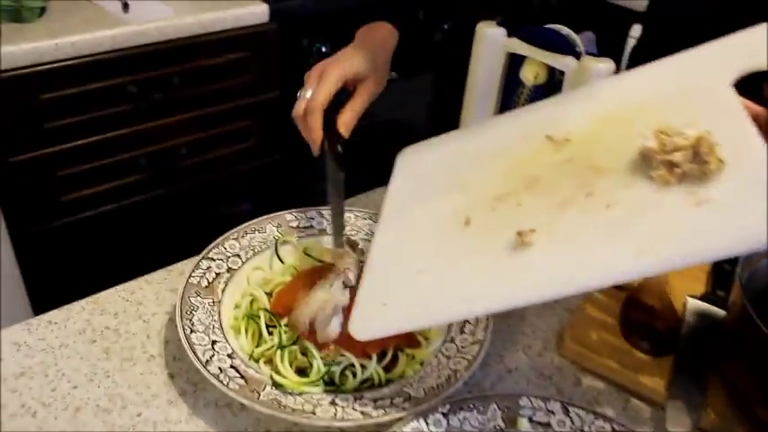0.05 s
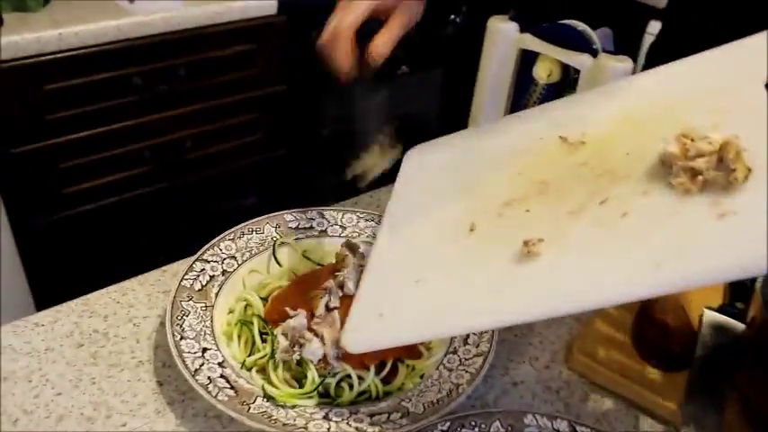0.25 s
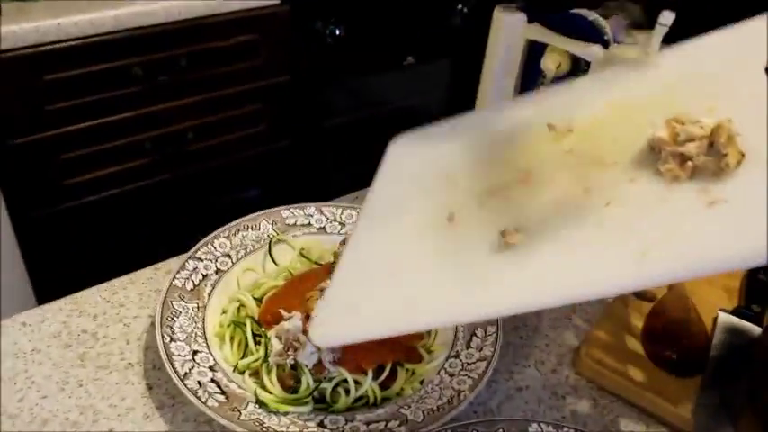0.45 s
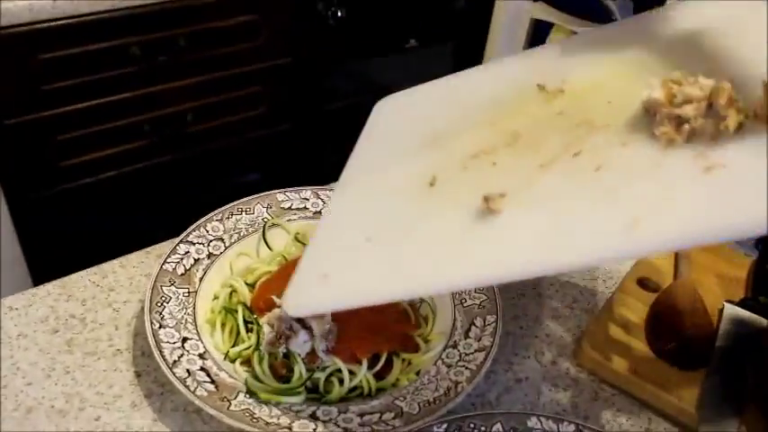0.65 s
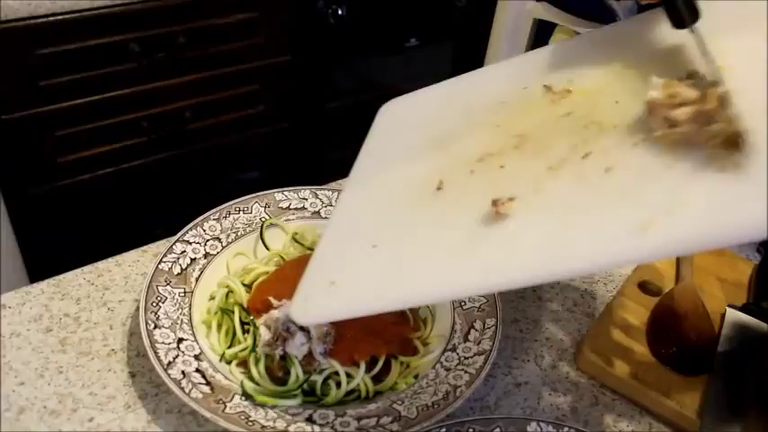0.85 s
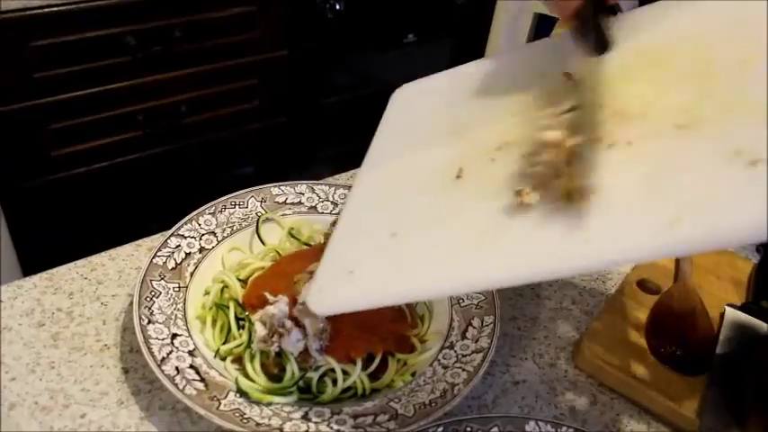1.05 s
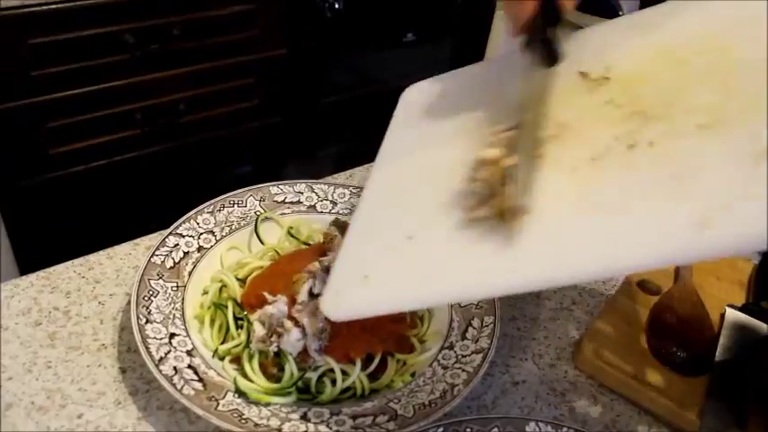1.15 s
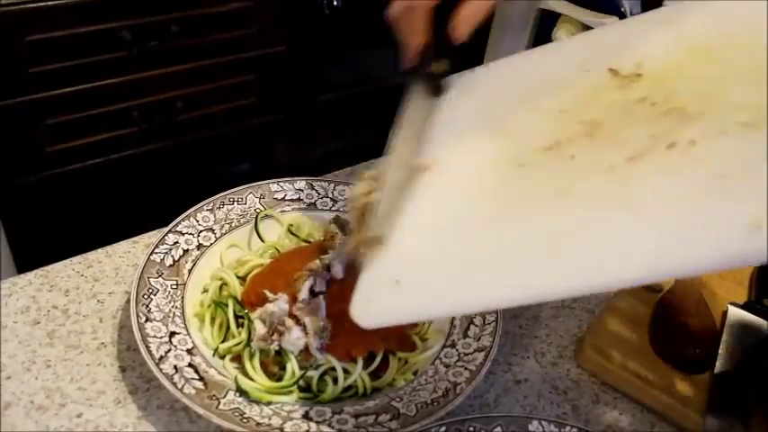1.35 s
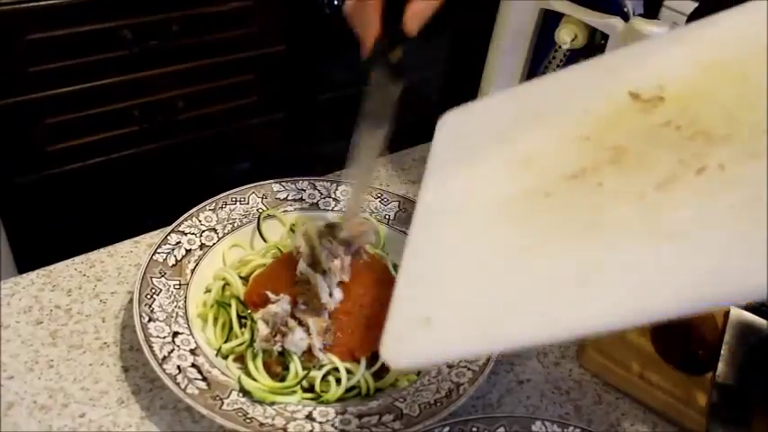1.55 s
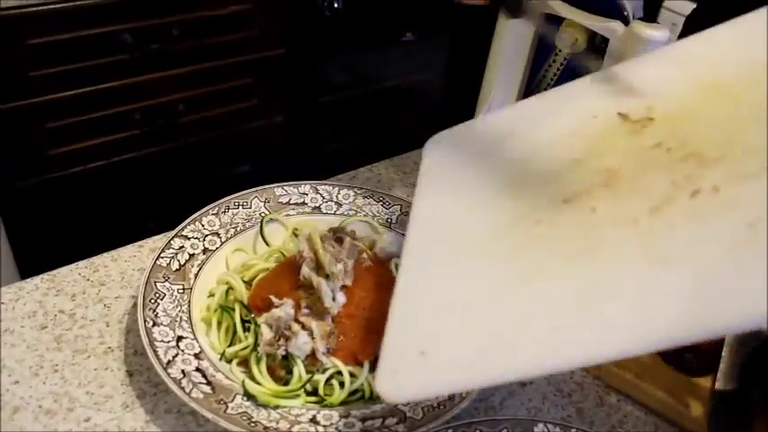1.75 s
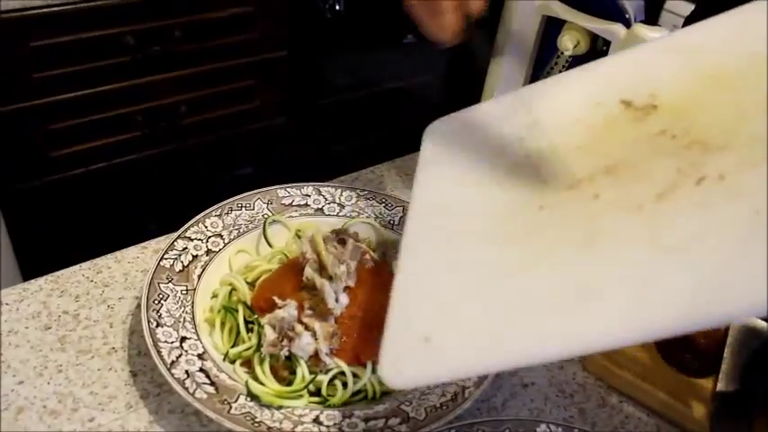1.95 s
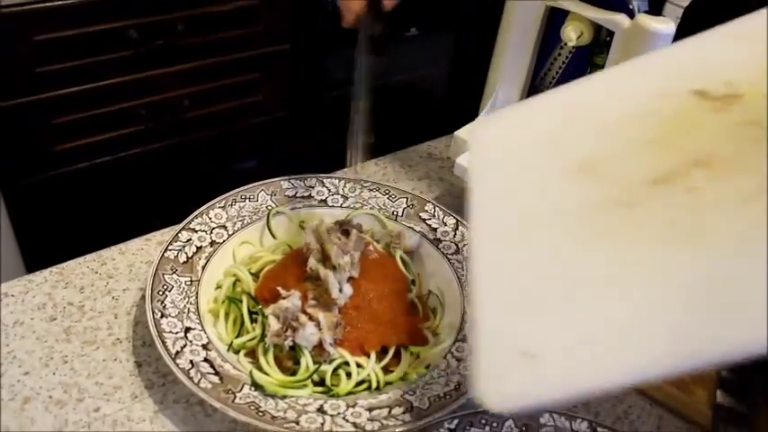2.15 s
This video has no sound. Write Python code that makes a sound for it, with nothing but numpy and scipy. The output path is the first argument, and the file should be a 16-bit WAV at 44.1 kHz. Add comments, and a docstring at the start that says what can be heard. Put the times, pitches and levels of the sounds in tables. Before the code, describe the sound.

A kitchen knife scrapes across a plastic chopping board, with a sharp crack before and a knock after.

```python
"""A kitchen knife scrapes along a plastic chopping board, judders and slides off the rim: one close microphone.
Random catches of the edge drive the board's and blade's resonances; short blows ring the board before and after.
The second blow starts a brief skid with a squeak. Before it all, food lands on a plate: shaped noise and clicks.
A small hard kitchen, made of decaying noise, answers at a lower level over room air and a faint hum."""
import sys
import numpy as np
from scipy import signal
from scipy.fft import rfft, irfft
from scipy.io import wavfile
from scipy.ndimage import uniform_filter1d

SR = 44100
rng = np.random.default_rng(int(sys.argv[2]) if len(sys.argv) > 2 else 0)


def to_wav(s):
    """Save 16-bit WAV."""
    ch = np.atleast_2d(s).T  # columns
    pcm = np.round(np.clip(ch, -1, 1) * 32767)  # PCM
    wavfile.write(sys.argv[1], SR, pcm.astype(np.int16))


N = 97020

# The long stroke. Each row: time in seconds, relative level in dB of the board's rumble, of the edge's rasp.
STROKE_LEVELS = [(.81, -38, -40), (.86, -41, -36.5), (.915, -38.5, -40), (.95, -33.5, -33),
                 (1.04, -27, -23.5), (1.08, -26.5, -27), (1.145, -27.5, -27), (1.195, -35.5, -31),
                 (1.25, -28, -28.5), (1.31, -29, -29), (1.34, -31, -27), (1.375, -24, -25),
                 (1.41, -42.5, -25.5), (1.44, -44, -31), (1.455, -47, -27), (1.469, -43, -30)]
# The board's main resonance as the blade moves. Each row: time in seconds, centre in Hz, relative level in dB.
BOARD_RESONANCE = [(.85, 502, 1.5), (.94, 378, 6), (.99, 305.4, -1), (1.06, 353, -3), (1.14, 380, 4.5),
                   (1.21, 381, 2), (1.28, 502, -10), (1.35, 575, -9), (1.39, 525, -2.5), (1.47, 528, -1)]
# Colour of the board's rumble. Each row: frequency in Hz, relative level in dB.
RUMBLE_SPECTRUM = [(100, -37), (200, -28), (270, -2), (400, -4.5), (500, 5.5), (640, 3), (800, -2),
                   (1200, -10.5), (3000, -22)]
# Colour of the edge's rasp. Each row: frequency in Hz, relative level in dB.
RASP_SPECTRUM = [(200, -22.5), (500, -9), (900, 3), (1400, 1), (2000, -1), (2500, 0.5), (4000, -1),
                 (5500, -3.5), (8000, -10.5), (11000, -15.5), (14000, -23), (16000, -31.5)]
# Resonances under the sliding edge. Each row: centre in Hz, half-width in Hz,
# relative level in dB early in the stroke, late in the stroke, in the skid.
BLADE_MODES = [(515.4, 14, -6.5, -15.5, -4.5), (624, 40, -16, -10, -22), (772, 57, -13.5, -6.5, -13),
               (873, 103, -37, -9.5, -27), (1052.7, 38, -3, -9, -11), (1799, 102, -4.5, -9, -15),
               (2153, 138, -12.5, -3.5, -12), (3405, 230, -25, -6, -9), (4504, 165, -3.5, -5, -7.5),
               (5796, 120, -9, -15, -18), (6430, 480, -14.5, -12.5, -18), (7450, 790, -15, -21, -21),
               (9050, 440, -24, -20.5, -16.5), (10360, 270, -34, -18.5, -42), (11580, 620, -23, -20, -30),
               (15200, 420, -48, -20, -37)]
# Colour of the snap off the rim. Each row: frequency in Hz, relative level in dB.
SNAP_SPECTRUM = [(200, -25), (900, 0), (2200, -2), (3600, -5), (4600, 4), (5600, 1), (9000, -13),
                 (13000, -17), (15500, -7)]
# High resonances of the edge just after landing. Each row: centre in Hz, half-width in Hz, relative level in dB.
FIZZ_MODES = [(7600, 500, -5), (8650, 240, -3), (10400, 180, -3), (11950, 250, -1.5), (13500, 400, -2),
              (15200, 500, -7)]
# Blows of the knife. Each row: start in seconds, relative level in dB,
# hardness from 0 (a dull knock) to 1 (a crack of the edge).
KNIFE_BLOWS = [(.7988, -15.5, 1), (.7999, -12.5, 0.66), (.8011, -17.5, 1), (.8041, -20, 0.93),
               (0.8069, -23.5, 0.4), (0.8113, -22, 0.97), (1.984, -9, 0.016), (1.9876, -20, 0.58)]
# Colour of a hard contact. Each row: frequency in Hz, relative level in dB.
CRACK_SPECTRUM = [(60, -54), (150, -22), (260, 10.5), (420, 9), (540, -22), (700, -17.5), (1150, 8),
                  (1450, 8.5), (1750, -0.5), (2080, -8.5), (2500, 1), (3500, -1), (6000, -9), (7500, -37),
                  (16000, -47)]
# Colour of a dull contact. Each row: frequency in Hz, relative level in dB.
KNOCK_SPECTRUM = [(60, -51), (140, -31), (250, -11.5), (430, -7.5), (570, 3), (980, -6), (1400, -17.5),
                  (2600, -16), (4500, -44), (16000, -41)]
# Long rings of board and knife. Each row: frequency in Hz, 60 dB decay in seconds,
# level in dB after the cracks, level in dB after the knocks.
LONG_RINGS = [(495.5, .36, -21, -26), (623, .22, -60, -53), (830, 0.2, -72, -38), (1026, 0.4, -34.5, -35),
              (1120, 0.44, -32, -50.5), (1337, 0.41, -29, -41), (1770, 0.17, -26, -44),
              (4829, 0.65, -45, -50.5)]
# Colour of the skid's rasp. Each row: frequency in Hz, relative level in dB.
SKID_SPECTRUM = [(150, -34), (350, -7), (600, -9), (1500, -0.5), (3200, -1.5), (5200, -4), (8500, -9),
                 (11000, -17), (14000, -22), (16000, -30)]
# Food landing on the plate. Each row: peak in seconds, rise in seconds, decay in seconds,
# level in dB of the thud, level in dB of the wet crackle.
FOOD_DROPS = [(.006, 0.0098, 0.013, -36.5, -43.5), (0.071, 0.012, 0.022, -35.5, -34.5),
              (.2, 0.11, 0.066, -66, -45.5)]
# Colour of the plate's thud. Each row: frequency in Hz, relative level in dB.
THUD_SPECTRUM = [(50, -20), (110, -6), (170, 0), (300, -2), (600, -10), (1500, -22), (5000, -53)]
# Colour of the wet crackle. Each row: frequency in Hz, relative level in dB.
SQUELCH_SPECTRUM = [(200, -29), (700, -0.5), (1050, 2.5), (2000, -6), (4300, -6.5), (7000, -16),
                    (11000, -25.5), (16000, -29)]
# Decay of the kitchen. Each row: band centre in Hz, 60 dB decay in seconds.
ROOM_DECAYS = [(150, 0.4), (500, 0.3), (1500, 0.35), (3500, 0.35), (7000, 0.31), (15000, 0.25)]
# Colour of the room air. Each row: frequency in Hz, relative level in dB.
AIR_SPECTRUM = [(15, -56), (25, -14.5), (144, -3.5), (289, -4), (340, -8.5), (457, -3.5), (552, -7),
                (614, -8), (895, -14.5), (1170, -14), (2060, -17.5), (2920, -18.5), (15500, -31)]
# Appliance hum. Each row: frequency in Hz, mid level in dB.
HUM_TONES = [(98, -66.5)]

# Friction: tiny catches of the edge, their unevenness, the wavering grip
CATCHES_PER_S, CATCH_SPREAD_DB, GRIP_DB = 1600, 3, 1.5
# Judder: rate, relative jitter of its period and greatest share of the friction's power
JUDDER_S, JUDDER_LENGTH_S, JUDDER_HZ, JUDDER_JITTER, JUDDER_SHARE = 1.39, 0.036, 256.6, .07, 0.95
COLOUR_EARLY_S, COLOUR_LATE_S = 1.01, 1.2  # the blade's colour moves from early to late
DRIFT, DRIFT_PER_S = 0.016, 9.15  # relative wander of the resonances as the contact point moves
RUMBLE_DB, BOARD_DB = -3, -4.5  # board's fixed colour and its moving resonance
BOARD_WIDTH_HZ, BOARD_LOW_HZ = 38, 264  # half-width; the moving resonance radiates little below the second
RIM_S, RIM_LENGTH_S, RIM_DB = 1.4677, 0.0016, -20.5  # snap off the rim
FIZZ_S, FIZZ_END_S, FIZZ_DB = .803, 0.866, -50
FLUTTER_S, FLUTTER_DB = 0.0016, -2.5  # bending waves in the board after each hard contact
SKID_S, SKID_END_S, SKID_DB, SKID_SAG_DB_PER_S = 1.9868, 2.081, -30, 46
BITE_DB, BITE_S = 10, 0.0029  # extra force at the start of the skid and its decay time
SQUEAK_S, SQUEAK_LENGTH_S, SQUEAK_HZ, SQUEAK_DB, SQUEAK_WAVER_HZ = 2.016, 0.02, 5805, -31, 55.3
ROOM_GAP_S, ROOM_BUILD_S, BLOW_ROOM_DB, SLIDE_ROOM_DB = 0.0021, 0.0052, -6.5, -4.5
AIR_DB = -50
TOP_HZ = 15750  # upper limit of the recorder


def scrape(t):
    """One long stroke drives board and blade and ends in a snap at the rim."""
    force = friction(t) * gate(t, STROKE_LEVELS[0][0], RIM_S)
    edge = force * undb(curve(t, STROKE_LEVELS, axis=2))
    late = np.interp(t, [COLOUR_EARLY_S, COLOUR_LATE_S], [0, 1])
    blade = np.zeros(N)
    for hz, half_width, early_db, late_db, _ in BLADE_MODES:
        drive = edge * undb(early_db + (late_db - early_db) * late)
        blade += sing(drive, hz * (1 + DRIFT * wander(DRIFT_PER_S)), half_width)
    snap_shape = undb(RIM_DB) * np.exp(-((t - RIM_S) / RIM_LENGTH_S) ** 2)
    snap = play(snap_shape * rng.standard_normal(N), body(SNAP_SPECTRUM))
    rumble = board(force * undb(curve(t, STROKE_LEVELS)), t)
    rasp = play(edge, body(RASP_SPECTRUM))
    return rumble + undb(-2.5) * rasp + undb(-5.0) * blade + snap


def friction(t):
    """The edge catches on the scored plastic; near the rim the catches lock into a judder."""
    slips = np.zeros(N)
    periods = np.exp(JUDDER_JITTER * rng.standard_normal(1000)) / JUDDER_HZ
    times = np.cumsum(periods)
    slips[(times[times < t[-1]] * SR).astype(int)] = 1
    share = JUDDER_SHARE * np.exp(-((t - JUDDER_S) / JUDDER_LENGTH_S) ** 2)
    loose = clicks(CATCHES_PER_S, CATCH_SPREAD_DB) * np.sqrt(1 - share)
    locked = unit(slips) * np.sqrt(share)
    return (loose + locked) * undb(GRIP_DB * wander(90))


def board(force, t):
    """The board rumbles, with one resonance that follows the blade's place."""
    drive = force * undb(BOARD_DB + curve(t, BOARD_RESONANCE, axis=2))
    moving = sing(drive, curve(t, BOARD_RESONANCE), BOARD_WIDTH_HZ)
    low_cut = signal.butter(2, BOARD_LOW_HZ, "high", fs=SR, output="sos")
    return undb(RUMBLE_DB) * play(force, body(RUMBLE_SPECTRUM)) + signal.sosfilt(low_cut, moving)


def fizz(t):
    """Just after landing the edge grazes the plastic and excites thin, high resonances."""
    edge = undb(FIZZ_DB) * clicks(CATCHES_PER_S, CATCH_SPREAD_DB) * gate(t, FIZZ_S, FIZZ_END_S)
    modes = sum(undb(db) * resonance(hz, half_width) for hz, half_width, db in FIZZ_MODES)
    return play(edge, modes)


def blows(t):
    """The knife strikes and bounces: impulses give short contacts and the rings that they leave."""
    hard, dull = np.zeros(N), np.zeros(N)
    for start, db, hardness in KNIFE_BLOWS:
        hard[int(start * SR)] += undb(db) * hardness
        dull[int(start * SR)] += undb(db) * (1 - hardness)
    # A short swelling and dying noise stands for waves running to and fro in the board
    flutter = rng.standard_normal(N) * np.exp(-t / FLUTTER_S) * np.minimum(t / FLUTTER_S, 1)
    flutter /= np.linalg.norm(flutter)
    cracks = hard + undb(FLUTTER_DB) * play(hard, flutter)
    contact = play(cracks, body(CRACK_SPECTRUM)) + play(dull, body(KNOCK_SPECTRUM))
    contact *= -np.sqrt(SR / 200)  # inverted, and raised so that levels refer to 5 ms
    hard /= np.linalg.norm(hard)
    dull /= np.linalg.norm(dull)
    rings = np.zeros(N)
    for hz, t60, crack_db, knock_db in LONG_RINGS:
        ring = np.cos(2 * np.pi * hz * t) * np.exp(-np.log(1000) * t / t60)
        rings += play(hard * undb(crack_db) + dull * undb(knock_db), ring)
    return contact, rings


def skid(t):
    """After the knock the edge bites, skids under a sagging force and the blade sings."""
    since = np.maximum(t - SKID_S, 0)
    force_db = SKID_DB - SKID_SAG_DB_PER_S * since + BITE_DB * np.exp(-since / BITE_S)
    edge = clicks(CATCHES_PER_S, CATCH_SPREAD_DB) * gate(t, SKID_S, SKID_END_S) * undb(force_db)
    blade = sum(undb(db) * resonance(hz, half_width) for hz, half_width, _, _, db in BLADE_MODES)
    return undb(-1.5) * play(edge, body(SKID_SPECTRUM)) + undb(-3.5) * play(edge, blade)


def squeak(t):
    """Early in the skid the edge locks to one blade mode: a brief wavering tone."""
    phase = 2 * np.pi * np.cumsum(SQUEAK_HZ + SQUEAK_WAVER_HZ * wander(200)) / SR
    swell = np.exp(-((t - SQUEAK_S) / SQUEAK_LENGTH_S) ** 2) * gate(t, SKID_S, SKID_END_S)
    return undb(SQUEAK_DB + 2 * wander(150)) * swell * np.sin(phase)


def food(t):
    """Soft pieces shaken from the knife drop on the plate: a noise thud and a wet crackle of clicks."""
    thud, wet = np.zeros(N), np.zeros(N)
    for peak, rise, decay, thud_db, wet_db in FOOD_DROPS:
        shape = np.exp(-np.maximum((peak - t) / rise, (t - peak) / decay))
        thud += undb(thud_db) * shape
        wet += undb(wet_db) * shape
    thuds = play(thud * rng.standard_normal(N), body(THUD_SPECTRUM))
    return thuds + play(wet * clicks(5000, 2.6), body(SQUELCH_SPECTRUM))


def kitchen():
    """Room response: dense reflections build up while each band of noise dies at its own rate."""
    t = np.arange(SR // 2) / SR
    noise = rfft(rng.standard_normal(len(t)))
    octave = np.log2(np.fft.rfftfreq(len(t), 1 / SR) + 1)
    centres = np.log2([hz for hz, _ in ROOM_DECAYS])
    response = np.zeros(len(t))
    for band, (_, t60) in zip(np.eye(len(centres)), ROOM_DECAYS):
        band_noise = irfft(noise * np.interp(octave, centres, band), len(t))
        response += band_noise * np.exp(-np.log(1000) * t / t60)
    response *= np.clip((t - ROOM_GAP_S) / ROOM_BUILD_S, 0, 1)
    return response / np.linalg.norm(response)


def background(t):
    """Steady room air of coloured noise and a faint appliance hum of slowly wavering sines."""
    hum = np.zeros(N)
    for hz, db in HUM_TONES:
        tone = np.sqrt(2) * np.sin(2 * np.pi * hz * t + .5 * wander(5))
        hum += undb(db + 2 * wander(4)) * tone
    air = unit(play(rng.standard_normal(N), body(AIR_SPECTRUM)))
    return undb(AIR_DB) * air + hum


def undb(db):
    """Decibels to gain."""
    return 10 ** (np.asarray(db) / 20)


def unit(x):
    """Scale to rms 1."""
    return x / np.sqrt(np.mean(x ** 2))


def curve(t, rows, axis=1):
    """One column of a table, joined by straight lines."""
    rows = np.array(rows, float)
    return np.interp(t, rows[:, 0], rows[:, axis])


def play(x, response):
    """Send a sound through an impulse response."""
    return signal.fftconvolve(x, response)[:N]


def body(points, size=8192):
    """Minimum-phase impulse response of unit energy with the given spectrum."""
    hz, db = np.array(points, float).T
    log_hz = np.log(np.fft.rfftfreq(size, 1 / SR) + 1)
    gain = undb(np.interp(log_hz, np.log(hz), db))
    cepstrum = irfft(np.log(gain))
    cepstrum[1:size // 2] *= 2  # folding the cepstrum makes the response causal
    cepstrum[size // 2 + 1:] = 0
    response = irfft(np.exp(rfft(cepstrum)))[:size // 2]
    return response / np.linalg.norm(response)


def resonance(hz, half_width_hz, size=8192):
    """Impulse response of one resonance with steep skirts, 6 dB down at the half-width, unit energy."""
    t = np.arange(size) / SR
    response = t * np.cos(2 * np.pi * hz * t) * np.exp(-2 * np.pi * half_width_hz * t)
    return response / np.linalg.norm(response)


def sing(drive, hz, half_width_hz, size=8192):
    """Drive a resonance whose centre moves: shift down to 0 Hz, resonate there, shift back."""
    turn = np.exp(2j * np.pi * np.cumsum(hz) / SR)
    still = play(drive / turn, resonance(0, half_width_hz, size))
    return np.sqrt(2) * (turn * still).real


def wander(rate):
    """Smooth random curve of rms 1, with a new random value rate times a second."""
    step = int(SR / rate)
    held = np.repeat(rng.standard_normal(N // step + 1), step)
    return unit(uniform_filter1d(held, step)[:N])


def clicks(per_s, spread_db):
    """Random tiny clicks of uneven size and either sign, rms 1."""
    size = undb(spread_db * np.minimum(rng.exponential(size=N), 4))
    return unit((rng.random(N) < per_s / SR) * size * rng.choice([-1, 1], N))


def gate(t, start, end):
    """1 while the blade touches, with 2 ms edges."""
    return np.clip(np.minimum(t - start, end - t) / .002, 0, 1)


def scene():
    """All sources in the kitchen, at one microphone; the long rings reach it without echo."""
    t = np.arange(N) / SR
    contact, rings = blows(t)
    sliding = scrape(t) + fizz(t) + skid(t) + squeak(t) + food(t)
    echo = play(undb(BLOW_ROOM_DB) * contact + undb(SLIDE_ROOM_DB) * sliding, kitchen())
    return (contact + rings + sliding + echo + background(t))[None]


def record(dry):
    """The recorder clips at full scale, then a steep low-pass cuts the top."""
    top_cut = signal.ellip(10, .1, 80, TOP_HZ, fs=SR, output="sos")
    return signal.sosfilt(top_cut, np.clip(dry, -1, 1))


dry = scene()
out = record(dry)
to_wav(out)
```